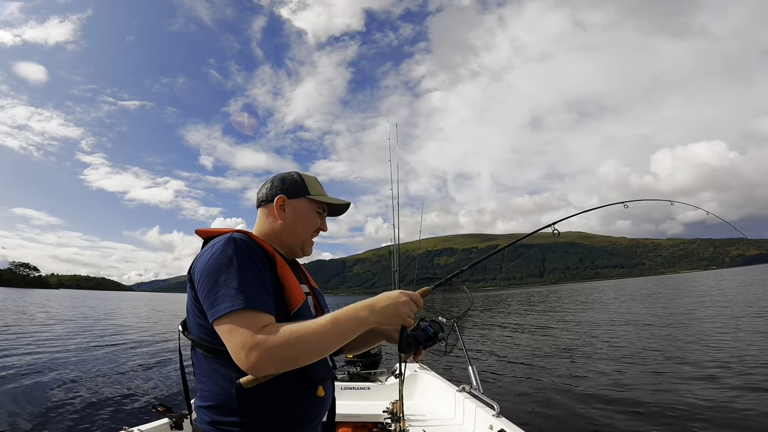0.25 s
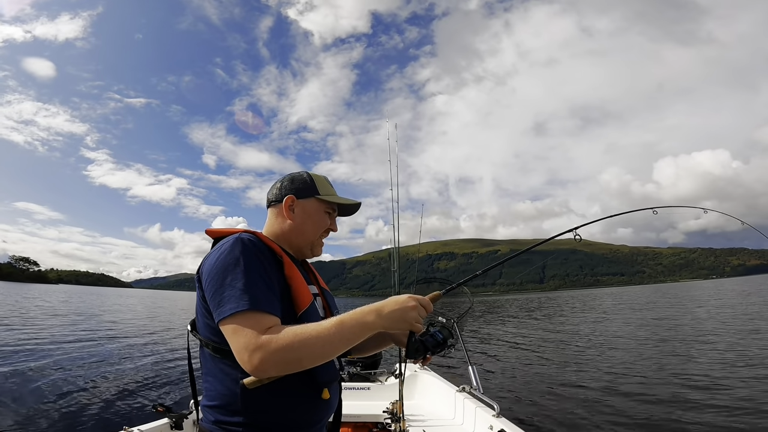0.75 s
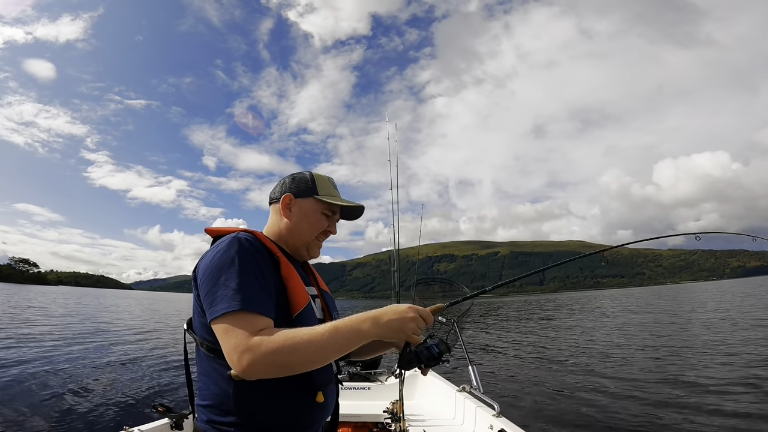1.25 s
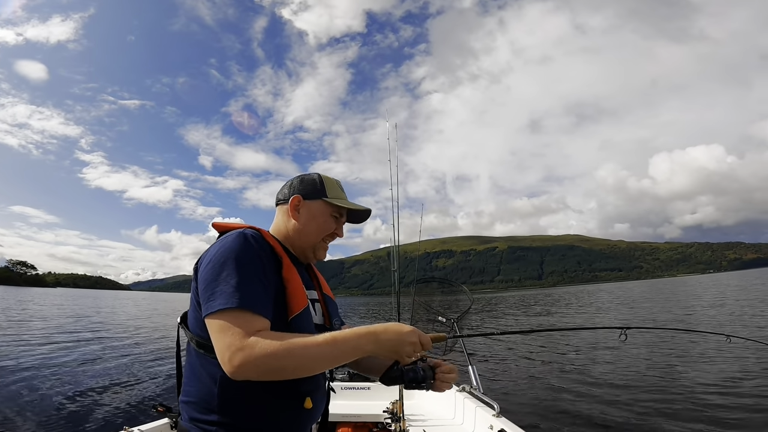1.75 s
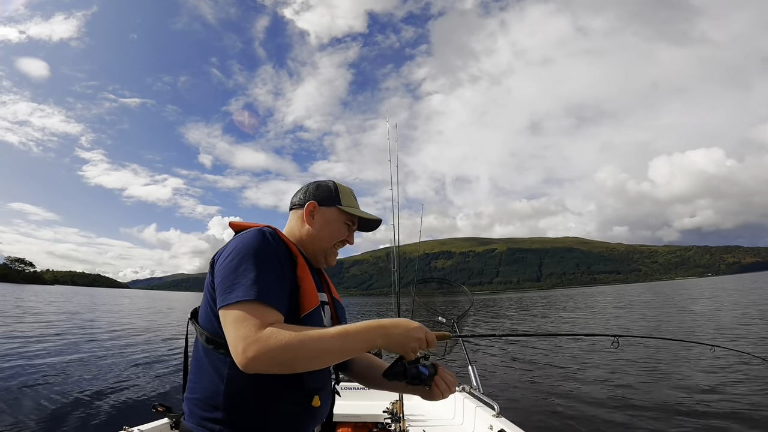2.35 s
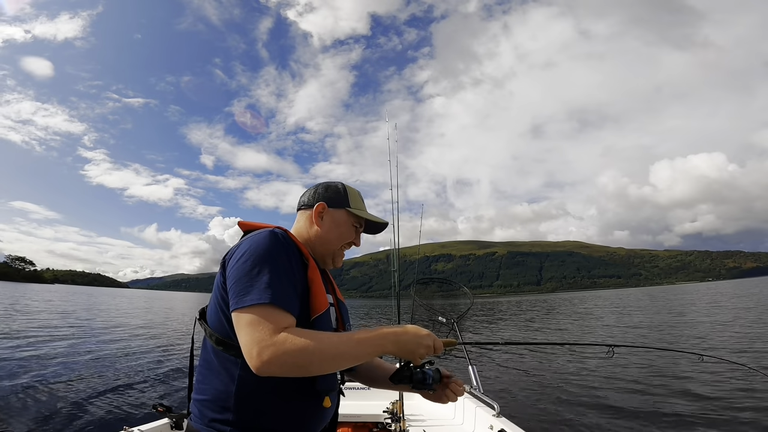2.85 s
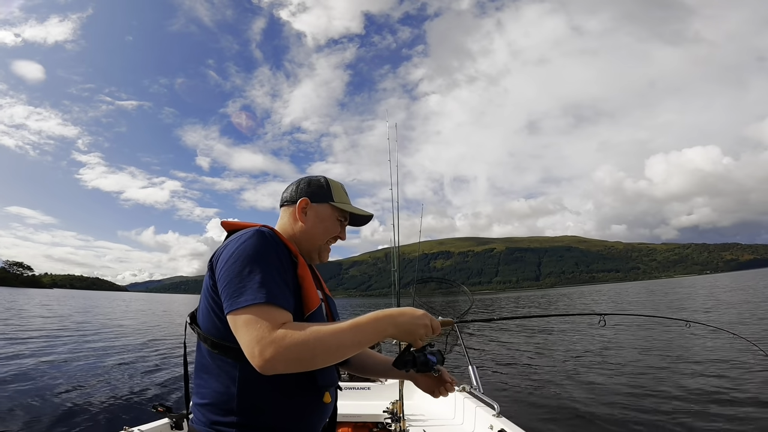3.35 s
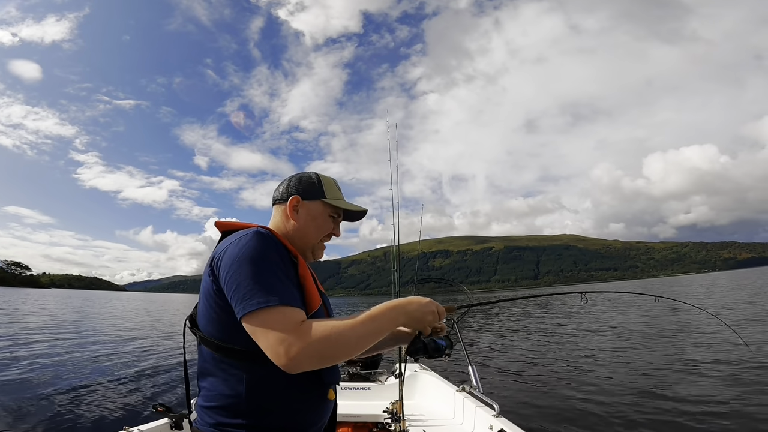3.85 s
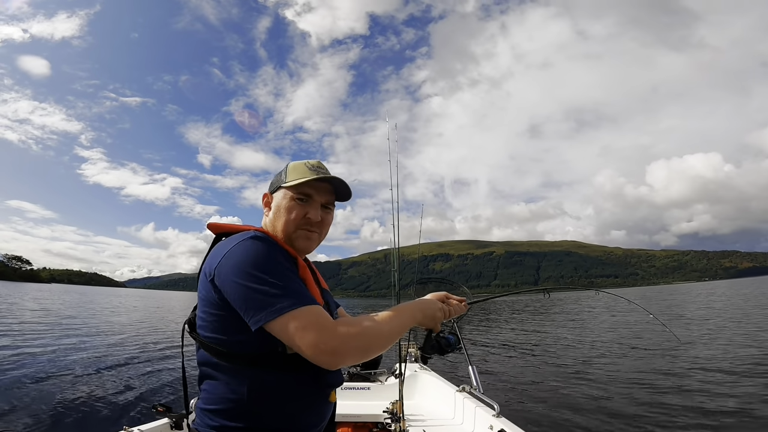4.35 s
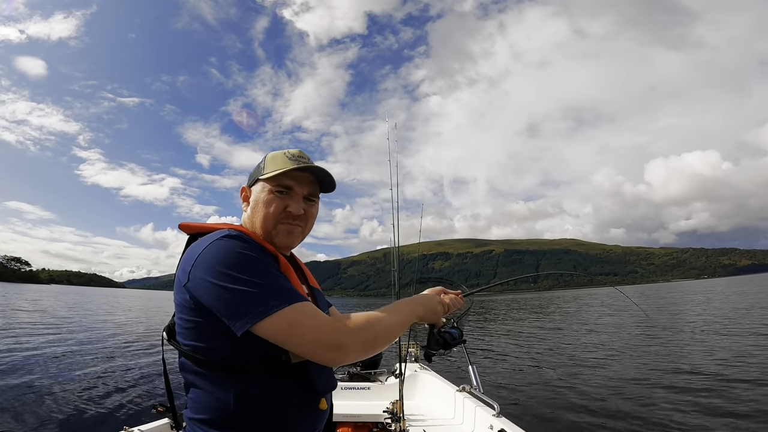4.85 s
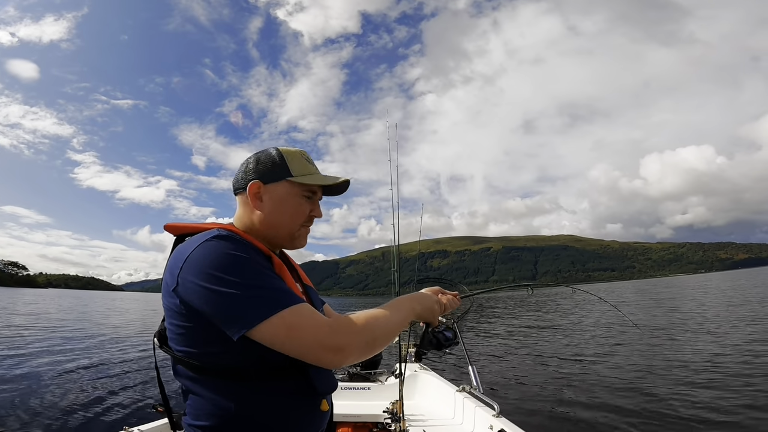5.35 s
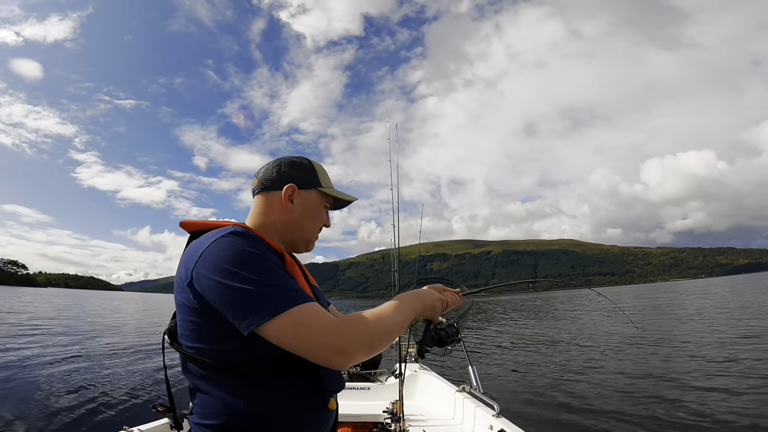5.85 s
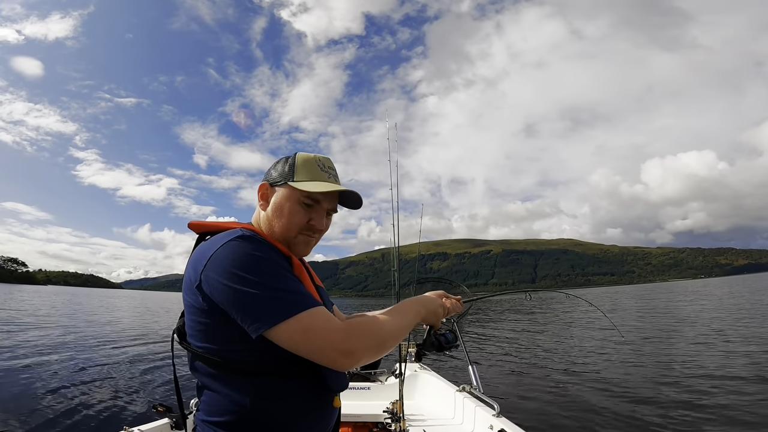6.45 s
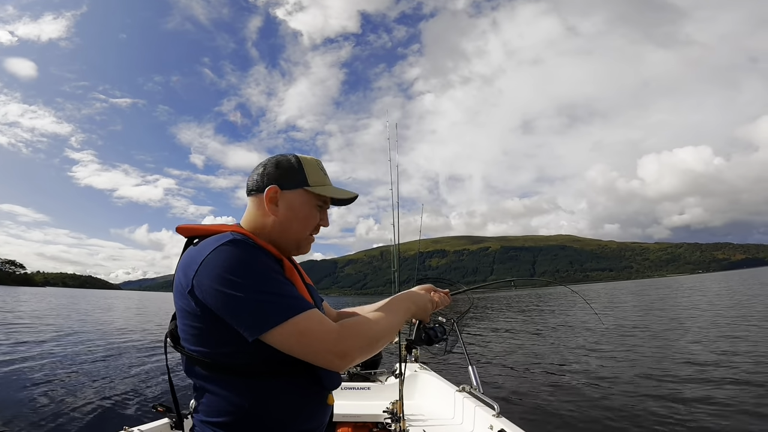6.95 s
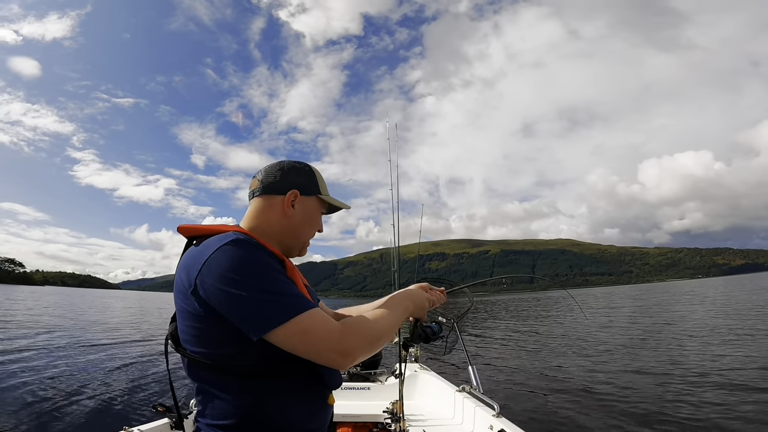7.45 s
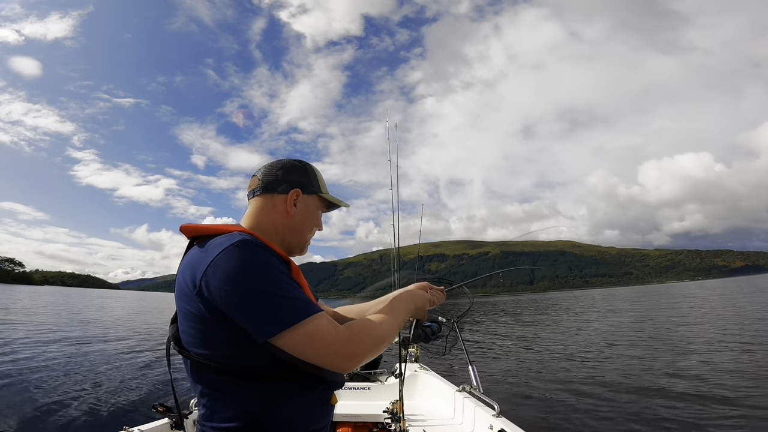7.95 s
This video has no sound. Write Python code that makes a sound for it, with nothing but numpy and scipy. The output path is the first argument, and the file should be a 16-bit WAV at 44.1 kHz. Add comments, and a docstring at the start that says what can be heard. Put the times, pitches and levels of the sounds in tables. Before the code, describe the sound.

Quiet open lake: low fluttering breeze and soft rippling water for about a second and a half. A dull knock rattles the reel, then its drag clicks into a bright, ringing metallic buzz that surges with each tug, slows to sparse ticks, races again and dies away in ticks. Faint low water slaps touch the hull. The reel is close and central, dry, with ripples and wind spread around the microphone.

```python
"""Fishing reel on a breezy lake

A hooked fish pulls line off a spinning reel, with a steady pull and sharp tugs, on a small drifting boat.
The drag's pawl (a sprung catch) snaps over the spool's teeth: lone ticks when slow, a buzz when fast.
Each snap is a pulse that sets off coloured noise and fading tones; the spool rings like a turning bell.
Fingers and line brush the rod now and then (bands of noise), and a hand knocks the reel before the line
runs (a struck ring). Ripples and wind are coloured noise; water slaps on the hull are low, fading tones."""
import sys
import numpy as np
from scipy import signal
from scipy.fft import rfft, irfft, next_fast_len
from scipy.io import wavfile
from scipy.ndimage import uniform_filter1d

SR = 44100
rng = np.random.default_rng(int(sys.argv[2]) if len(sys.argv) > 2 else 0)


def wav_record(signal):
    """Record a signal, one row per channel, as 16-bit PCM in the file named by sys.argv[1]."""
    frames = np.transpose(np.atleast_2d(signal))
    bounded = np.clip(frames, -1, 1)
    # unit amplitude maps onto the largest positive 16-bit level
    quanta = np.round(bounded * 32767).astype(np.int16)
    wavfile.write(sys.argv[1], SR, quanta)


N = 361179

# Levels in the tables are relative: each sound's own settings then shift them.
# gusts (plus) and lulls (minus) in the breeze: middle t/s, level change/dB, length/s
GUSTS = [(.15, 10, 0.13), (.76, -11, 0.18), (1.37, 12, 0.44), (1.715, 7.5, 0.41), (2.17, 12.5, 0.13),
         (2.82, -18, 0.31), (3.45, 10, 0.093), (3.96, 14.5, .26), (4.16, 10.5, 0.34), (4.97, -21, 0.17),
         (5.6, -14.5, 0.21), (5.98, -22, 0.14), (6.912, 8.5, 0.94), (7.95, -14.5, 1.1)]
# colour of the wind: f/Hz, level/dB
WIND_COLOUR = [(15, 5), (35, 2.5), (65, 6.5), (100, -2), (200, -25.5), (500, -54.5), (4000, -81)]
# colour of the rippling water: f/Hz, level/dB
WATER_COLOUR = [(40, -8), (100, -1.5), (170, 1), (260, -5.5), (400, -11), (700, -12), (1200, -13),
                (1800, -22), (3000, -37.5), (4500, -42.5), (7500, -44.5), (9500, -60.5), (15000, -86)]
# water slaps under the hull: t/s, level/dB, f/Hz, time to fade by 60 dB/s
HULL_SLAPS = [(2.158, -41, 110, 0.13), (4.629, -36.5, 74, 0.1), (4.702, -45, 505, 0.04),
              (7.058, -32, 143, 0.078)]
# fingers and line brush the rod: start t/s, level/dB, centre f/Hz, length/s
BRUSHES = [(0.492, -72, 4500, 0.01), (0.646, -73, 6960, 0.011), (0.91, -78.5, 7500, 0.41),
           (1.493, -55, 2760, 0.022), (1.497, -76, 6130, 0.1), (1.655, -55.5, 630, 1),
           (4.69, -54.5, 1320, 0.028), (8.075, -73, 6000, 0.0093)]
# the hand knocks the reel: t/s, level/dB
KNOCKS = [(1.5751, -23)]
# tones that the knock rings: f/Hz, level/dB, time to fade by 60 dB/s
KNOCK_MODES = [(1170, -31, 0.029), (1430, -16, 0.059), (1650, -13, 0.017), (1740, -5.5, 0.058),
               (1850, -3, 0.019), (4400, -45, .1)]
# colour of the rattle after the knock: f/Hz, level/dB
RATTLE_COLOUR = [(100, -64), (400, -12), (850, -14), (1200, 11), (1800, 7), (2400, -7), (3300, -2),
                 (4000, 5), (4600, -12), (9000, -12), (15000, -29)]
# the spool creeps on by one tooth: t/s, level/dB
LONE_TICKS = [(1.6831, -28), (1.7189, -27.5), (4.5137, -31.5), (4.5721, -33.5), (4.6836, -34),
              (4.738, -34.5), (4.811, -31), (4.8585, -29), (4.9022, -30), (4.9528, -28), (5.03, -30),
              (7.1266, -31), (7.4451, -32.5), (7.9269, -37)]
# the spool slips under the steady pull until it catches: start t/s, end t/s, teeth passing the pawl f/Hz
RUNS = [(1.7454, 2.55, 43), (2.5695, 4.335, 43), (4.3485, 4.49, 43.8), (5.458, 7.11, 43),
        (7.1538, 7.26, 38.5), (7.2772, 7.42, 44.9)]
# the fish tugs and the spool speeds up: peak t/s, added tooth rate f/Hz, rise/s, fall/s
TUGS = [(1.969, 127.2, .238, .253), (2.194, 95.2, .08, .06), (2.413, 94, .355, .155),
        (2.67, 44.6, .092, .125), (3.001, 343.2, .246, .349), (3.218, 219.6, .252, 1.238),
        (4.159, 57.6, .106, .182), (5.672, 448.4, .213, .384), (5.953, 83.1, .208, .097),
        (6.2, 220.6, .177, .347), (6.496, 76.6, .164, .182), (6.738, 69.4, .099, .305),
        (7.027, 35.6, .094, .068), (7.201, 17, .088, .073)]
# how hard the pawl bites as the load on the line shifts: t/s, level/dB
BITE = [(1.75, -34), (2.35, -33.5), (2.58, -36.5), (2.75, -35.5), (3.0, -33.5), (3.5, -35), (4.3, -38),
        (4.48, -37.5), (5.55, -34.5), (6.0, -37), (6.25, -35.5), (6.65, -38), (7.1, -39), (7.35, -36.5)]
# colour of the pawl's snap: f/Hz, level/dB
SNAP_COLOUR = [(900, -23), (1400, 9.5), (2050, -2.5), (2450, 6), (3600, 1), (5000, 9), (6300, 4.5),
               (7400, 6.5), (8000, 1), (8700, 4), (10000, -1.5), (10800, -7), (15000, -18.5)]
# resonances of the reel's body and spring: f/Hz, level/dB, time to fade by 60 dB/s
BODY_MODES = [(1374, -19.5, 0.029), (1770, -36, 0.13), (2413, -26.5, 0.015), (3970, -16, 0.026),
              (4583, -18, 0.032), (4760, -14, 0.012), (5740, -29.5, 0.005), (7154, -28.5, 0.078),
              (8800, -33.5, 0.021), (9610, -25.5, 0.013)]
# bell modes of the spool, with 2, 3 and 4 waves round the rim: f/Hz, level/dB, time to fade by 60 dB/s
SPOOL_MODES = [(3905, -18.5, 0.34), (7172, -20.5, 0.33), (11950, -36.5, 0.17)]
# snaps fall in or out of step with the bell, which sings out or fades:
# middle t/s, lowest mode level change/dB, second mode level change/dB, length/s
SINGS = [(2.333, -8, -5, .25), (2.457, -3.5, 6, 0.22), (2.666, 8, -2.5, .1), (3.06, 9.5, 1, 0.22),
         (3.32, 7, 0.5, 0.17), (3.52, -9, 3, 0.1), (4.13, 8.5, 7, .42), (4.718, -5, 6.5, 0.47),
         (5.927, 6, 7, 0.38), (6.303, -11.5, 2, 0.34), (6.48, -11.5, 7.5, 0.13), (6.78, 3.5, -10, 0.51),
         (7.395, -9.5, -5.5, 0.43)]
# the reel at the microphone's two ports: f/Hz, phase by which the left leads/radians
PORT_LEADS = [(0, 1), (2000, -0.67), (4000, -0.71), (9000, -0.35), (12000, -0.9), (16000, -1.7)]

TEETH = 31  # round the spool
TIME = np.arange(N) / SR  # seconds


def undb(db):
    """Turn decibels into gain."""
    return 10 ** (np.asarray(db) / 20)


def unit(x):
    """Scale to an rms (average strength) of 1."""
    return x / np.sqrt(np.mean(x ** 2))


def colour(x, points):
    """Filter to a spectrum of (f/Hz, level/dB) points, with no sound ahead of its cause."""
    hz, db = np.transpose(points)
    size = 2 ** 19
    grid = np.maximum(np.arange(size // 2 + 1) * SR / size, 1)
    gain = undb(np.interp(np.log(grid), np.log(hz), db))
    # folding the cepstrum (spectrum of the log spectrum) forward gives a minimum-phase filter
    cepstrum = irfft(np.log(gain))
    cepstrum[1:size // 2] *= 2
    response = np.exp(rfft(cepstrum[:size // 2], size))
    return irfft(rfft(x, size) * response, size)[..., :N]


def fade(t60):
    """Half a second of exponential decay that drops 60 dB in t60 seconds."""
    return np.exp(-np.log(1000) * np.arange(SR // 2) / SR / t60)


def ring(x, modes):
    """Let x strike fading tones, as a blow does with a solid body."""
    t = np.arange(SR // 2) / SR
    tones = sum(undb(db) * fade(t60) * np.sin(2 * np.pi * hz * t) for hz, db, t60 in modes)
    return signal.fftconvolve(x, tones)[:N]


def pulses(times, sizes):
    """Sharp pulses, placed between samples with a short windowed sinc."""
    at = np.asarray(times)[:, None] * SR
    taps = at.astype(int) + np.arange(-7, 9)
    shape = np.sinc(taps - at) * np.sinc((taps - at) / 8)
    weights = shape * np.asarray(sizes)[:, None]
    return np.bincount(np.clip(taps, 0, N - 1).ravel(), weights.ravel(), N)


def energy_trail(x, t60):
    """Strength left behind by pulses whose energies add up and fade."""
    power = fade(t60) ** 2
    return np.sqrt(np.abs(signal.fftconvolve(x ** 2, power)[:N]))


def scatter(x, t60):
    """Each pulse sets off fading noise of equal energy, in two unrelated signals."""
    energy = np.sum(fade(t60) ** 2)
    return energy_trail(x, t60) / np.sqrt(energy) * rng.standard_normal((2, N))


def spread(pair, side_db):
    """Make stereo: the first signal in the middle, the second opposite in left and right."""
    return pair[0] + undb(side_db) * pair[1] * np.array([[1], [-1]])


def walk(rate):
    """Smooth random wandering with an rms of about 1, renewed about `rate` times a second."""
    k = int(SR / rate)
    steps = np.repeat(rng.standard_normal(N // k + 1), k)
    return unit(uniform_filter1d(uniform_filter1d(steps, k), k)[:N])


def swell(peak_s, rise_s, fall_s):
    """A smooth hump from 0 up to 1 and back."""
    t = TIME - peak_s
    return np.cos(np.pi / 2 * np.clip(t / np.where(t < 0, rise_s, fall_s), -1, 1)) ** 2


def hump(middle_s, length_s):
    """A swell that rises and falls equally."""
    return swell(middle_s, length_s / 2, length_s / 2)


def highpass(x, order, hz):
    """Weaken the sound below hz; a higher order cuts more steeply."""
    return signal.sosfilt(signal.butter(order, hz, "high", fs=SR, output="sos"), x)


def wind(breeze_db=-52, flutter_db=3, flutter_hz=22):
    """A fluttering breeze with gusts and lulls buffets the microphone, each port a little differently."""
    buffet = spread(rng.standard_normal((2, N)), side_db=-8.5)
    gusts = sum(db * hump(s, length) for s, db, length in GUSTS)
    level_db = breeze_db + gusts + flutter_db * walk(flutter_hz)
    return unit(colour(buffet, WIND_COLOUR)) * undb(level_db)


def lake(ripple_db=-52, fall_db_per_s=0.5, flicker_db=1.1, drop_db=-12):
    """Ripples wash, patter in many small splashes and settle slowly; now and then water slaps the hull."""
    wash = spread(rng.standard_normal((2, N)) * undb(flicker_db * walk(14)), side_db=-7)
    drops = rng.random((1500, 2))
    splashes = pulses(drops[:, 0] * N / SR, -np.log(drops[:, 1]))  # many small, few large
    patter = unit(spread(scatter(splashes, t60=0.057), side_db=-7))
    water = unit(colour(wash + undb(drop_db) * patter, WATER_COLOUR))
    ripples = water * undb(ripple_db - fall_db_per_s * TIME)
    slaps = sum(ring(pulses([s], [undb(db)]), [(hz, 0, t60)]) for s, db, hz, t60 in HULL_SLAPS)
    return ripples + slaps


def handling(rattle_db=13, rattle_t60=0.14, lowest_hz=800):
    """Soft brushes along the rod are swelling bands of noise; a dull knock rings and rattles the reel."""
    times, db = np.transpose(KNOCKS)
    blow = pulses(times, undb(db))
    rattle = colour(spread(scatter(blow, rattle_t60), side_db=-12), RATTLE_COLOUR)
    knock = ring(blow, KNOCK_MODES) + undb(rattle_db) * rattle
    out = highpass(knock, 2, lowest_hz)
    for s, db, hz, length in BRUSHES:
        band = signal.butter(2, [hz / 1.25, hz * 1.25], "band", fs=SR, output="sos")
        stroke = np.sin(np.pi * np.clip((TIME - s) / length, 0, 1))
        out = out + undb(db) * stroke * unit(signal.sosfilt(band, rng.standard_normal(N)))
    return out


def tooth_rate():
    """Speed of the spool in teeth a second: the steady pull plus every tug, and nothing between runs."""
    pull = sum(hz * ((TIME >= start) & (TIME < end)) for start, end, hz in RUNS)
    tugs = sum(hz * swell(s, rise, fall) for s, hz, rise, fall in TUGS)
    return pull + (pull > 0) * tugs


def pawl(rate, uneven_db=1.7, tick_db=-9, slip_teeth=0.012):
    """Times and sizes of all snaps: lone ticks, and one per passing tooth, each a little early or late."""
    tick_times, tick_levels = np.transpose(LONE_TICKS)
    times, levels = [tick_times], [tick_levels + tick_db]
    bite_times, bite_levels = np.transpose(BITE)
    for start, end, _ in RUNS:
        chance = rng.standard_normal((1000, 2))  # more rows than teeth in any run
        inside = (TIME >= start) & (TIME < end)
        passed = np.cumsum(rate[inside]) / SR
        tooth = np.arange(int(passed[-1]) + 1)
        at = np.interp(tooth + slip_teeth * chance[tooth, 0], passed, TIME[inside])
        times.append(at)
        levels.append(np.interp(at, bite_times, bite_levels) + uneven_db * chance[tooth, 1])
    times, levels = np.concatenate(times), np.concatenate(levels)
    order = np.argsort(times)
    return times[order], undb(levels[order])


def rebound(times, sizes, rebound_db=-11, uneven_db=4, earliest_s=0.002, window_s=0.006):
    """The sprung pawl bounces once after each snap, weakly and never quite alike."""
    chance = rng.standard_normal((2000, 2))[:len(times)]
    late = earliest_s + window_s * (1 + np.tanh(chance[:, 0])) / 2
    return pulses(times + late, sizes * undb(rebound_db + uneven_db * chance[:, 1]))


def round_the_spool(hits, angle, t60, count=5):
    """Each side of the spool has its own dense, short ring, so the snaps change colour as it turns."""
    out = 0
    for side in range(count):
        turned = np.angle(np.exp(1j * (angle - 2 * np.pi * side / count)))  # wrapped to half a turn
        away = turned * count / (2 * np.pi)  # in steps from one side to the next
        share = np.cos(np.pi / 2 * np.clip(away, -1, 1))
        response = (rng.standard_normal(SR // 2) * fade(t60))[:SR // 20]
        out = out + signal.oaconvolve(hits * share, response / np.linalg.norm(response))[:N]
    return out


def bell_shares(rate, rest_db=-4.5, slip_db=-2.5, wander_db=-1, second_db=-2.5, second_wander_db=3):
    """How much of each snap reaches each bell mode: the lowest gets more while slipping; two wander."""
    lowest_sing = sum(low * hump(s, length) for s, low, _, length in SINGS)
    second_sing = sum(second * hump(s, length) for s, _, second, length in SINGS)
    lowest = np.where(rate > 0, slip_db, rest_db) + lowest_sing + wander_db * walk(10)
    second = second_db + second_sing + second_wander_db * walk(11)
    return undb(lowest), undb(second), 1


def bell(hits, angle, shares, backward=0.26, evenness=0.26, split_hz=27, twin_db=-7):
    """The spool's modes ring on; their lobes sweep past as it turns, so they throb faster with speed."""
    out = 0
    for waves, ((hz, db, t60), share) in enumerate(zip(SPOOL_MODES, shares), 2):
        # the spool is not quite round: each mode has a close twin and beats with it
        twins = ring(hits * share, [(hz, -1, t60), (hz + split_hz, twin_db, t60)])
        swing = signal.hilbert(twins, next_fast_len(N))[:N]
        # the pawl rests on the spool and keeps snaps from piling up or cancelling fully
        usual = energy_trail(hits * share, t60)
        swing = swing * (usual / (np.abs(swing) + usual / 10 + 1e-12)) ** evenness
        lobes = np.exp(-1j * waves * angle) + backward * np.exp(1j * waves * angle)
        out = out + undb(db) * np.real(swing * lobes)
    return out


def drag(drag_db=19, land_db=-12.5, land_uneven_db=3, land_delay_s=0.000486, shell_t60=0.0081,
         chatter_db=-8, lead_in_db=-20, boat_db=-14, body_db=-8, lowest_hz=1170):
    """The pawl snaps, chatters and rings the reel, over a faint noise that swells around each snap;
    the boat throws a little back."""
    rate = tooth_rate()
    times, sizes = pawl(rate)
    hits = pulses(times, sizes)
    # each snap turns the spool on by one tooth
    angle = 2 * np.pi * np.interp(TIME, times, np.arange(len(times))) / TEETH
    # the pawl lands just after it slips off the tooth
    land_chance = rng.standard_normal(2000)[:len(times)]
    landing = pulses(times + land_delay_s, sizes * undb(land_uneven_db * land_chance))
    shell = round_the_spool(hits + rebound(times, sizes), angle, shell_t60)
    snap = undb(land_db) * landing + shell
    chatter = undb(chatter_db) * scatter(hits, t60=0.035)[0]
    # run backwards, the fade becomes a faint swell of noise ahead of each snap
    lead_in = undb(lead_in_db) * scatter(hits[::-1], t60=0.025)[0, ::-1]
    boat = undb(boat_db) * spread(scatter(hits, t60=0.12), side_db=0.5)
    clicks = colour(snap + chatter + lead_in + boat, SNAP_COLOUR)
    body = undb(0.5) * ring(undb(body_db) * snap + chatter, BODY_MODES)
    spool = undb(-6.5) * bell(hits, angle, bell_shares(rate))
    # little of the reel sounds below about 1.2 kHz
    return undb(drag_db) * highpass(clicks + body + spool, 5, lowest_hz)


def ports(x):
    """The reel's sound reaches the two ports slightly out of step, by a phase that varies with pitch."""
    size = next_fast_len(N)
    hz, lead = np.transpose(PORT_LEADS)
    turn = np.interp(np.arange(size // 2 + 1) * SR / size, hz, lead) * np.array([[0.5], [-0.5]])
    return irfft(rfft(x, size) * np.exp(1j * turn), size)[:, :N]


def scene(lean_db=0.23):
    """The reel is straight ahead; breeze and ripples come a little from the right."""
    reel = ports(drag() + handling())
    outdoors = (lake() + wind()) * undb([[-lean_db], [lean_db]])
    return reel + outdoors


def record(dry, top_hz=15600):
    """The camera cuts the highest treble with a steep low-pass filter."""
    return signal.sosfilt(signal.ellip(8, 0.2, 70, top_hz, fs=SR, output="sos"), dry)


dry = scene()
out = record(dry)
wav_record(out)
```